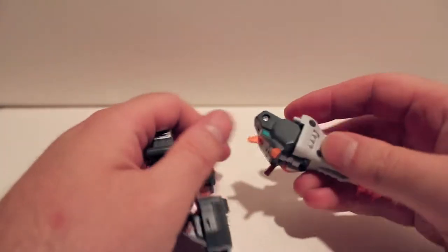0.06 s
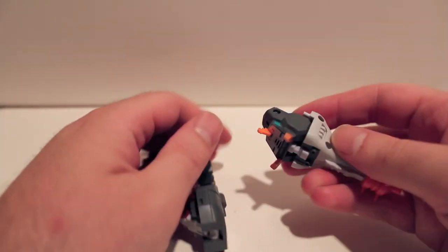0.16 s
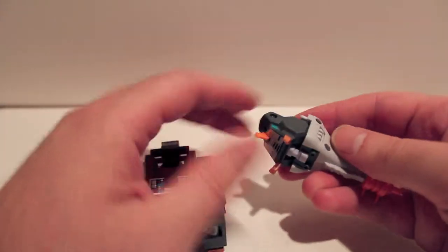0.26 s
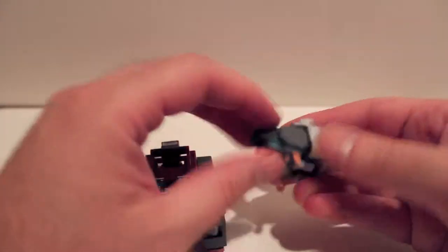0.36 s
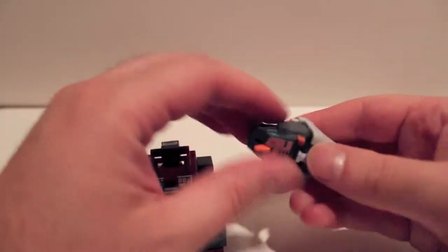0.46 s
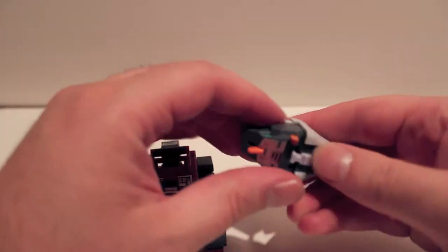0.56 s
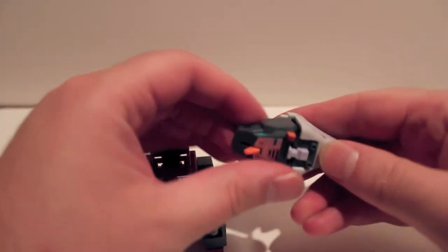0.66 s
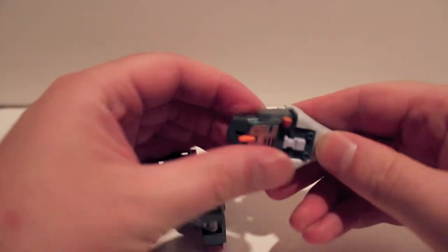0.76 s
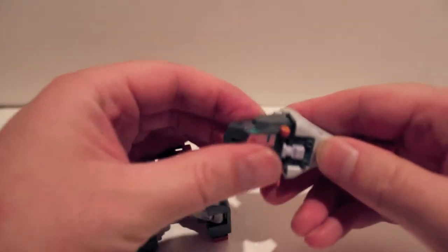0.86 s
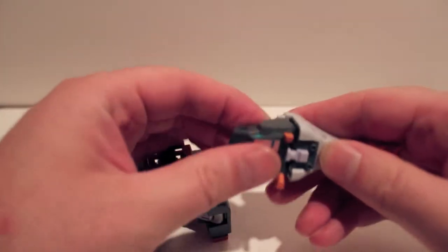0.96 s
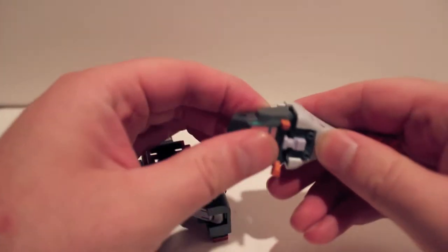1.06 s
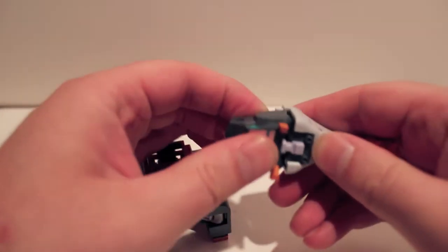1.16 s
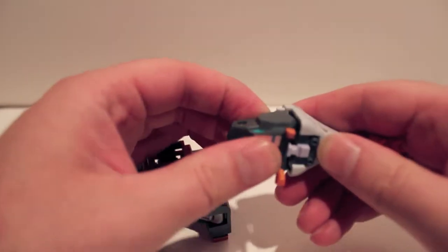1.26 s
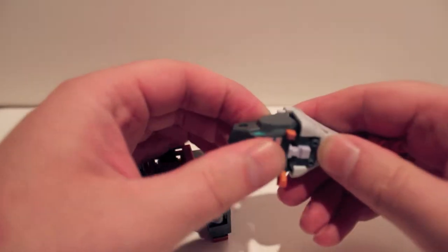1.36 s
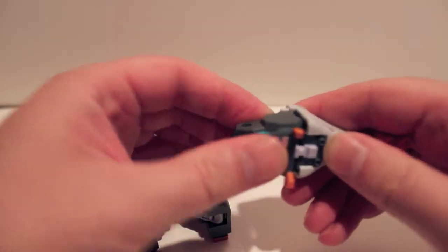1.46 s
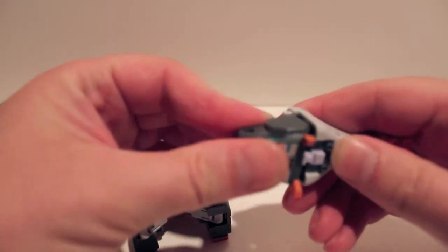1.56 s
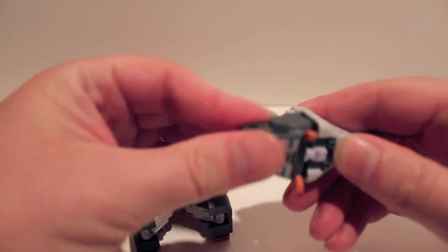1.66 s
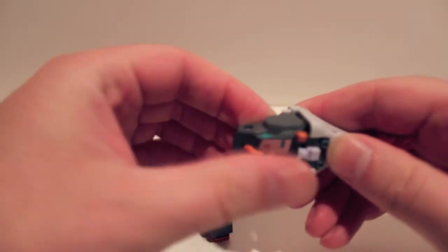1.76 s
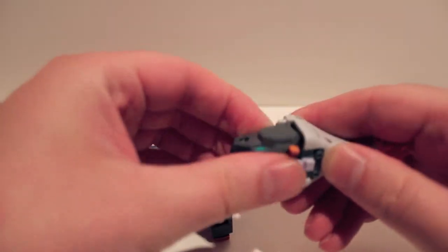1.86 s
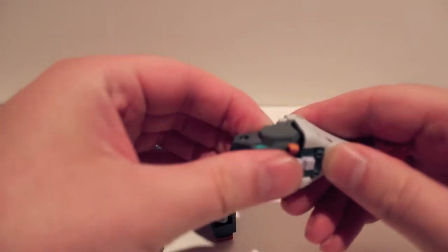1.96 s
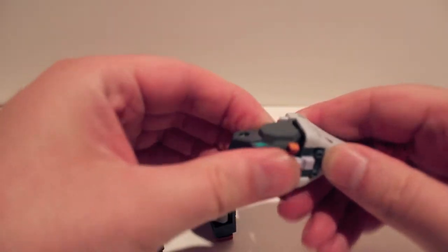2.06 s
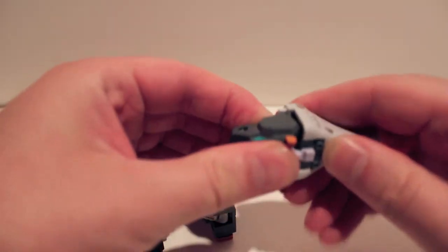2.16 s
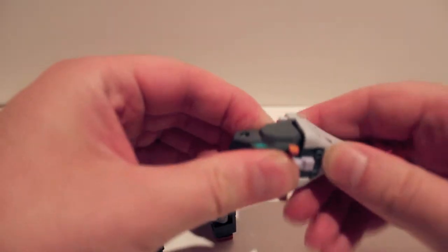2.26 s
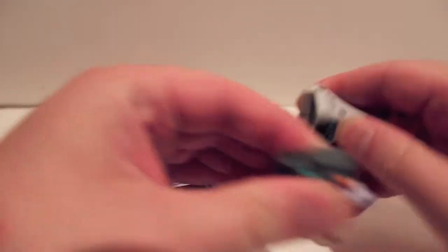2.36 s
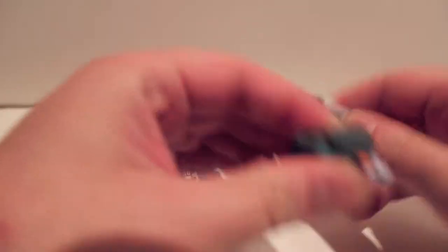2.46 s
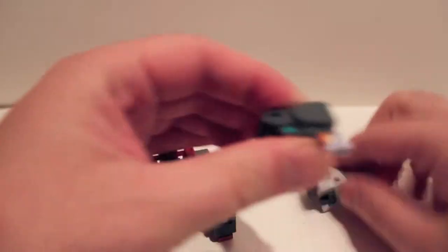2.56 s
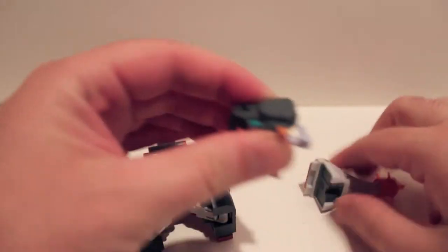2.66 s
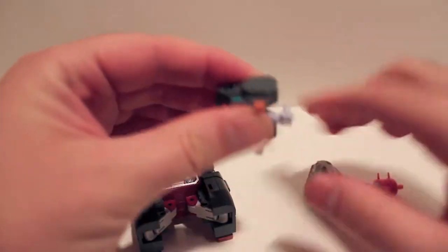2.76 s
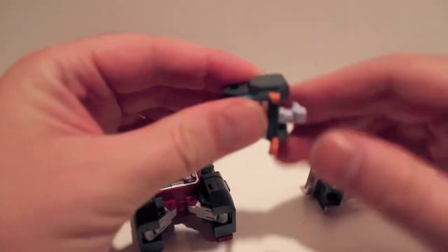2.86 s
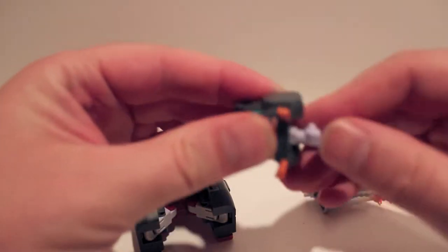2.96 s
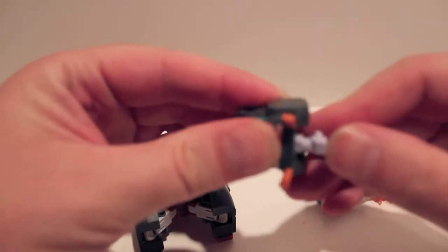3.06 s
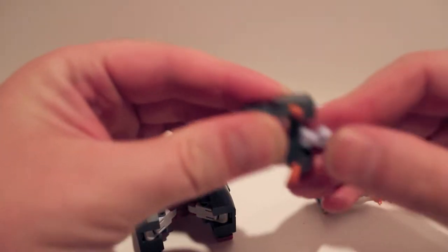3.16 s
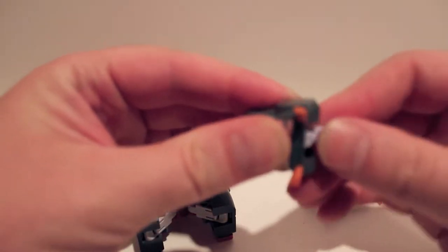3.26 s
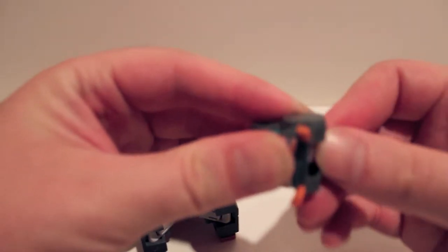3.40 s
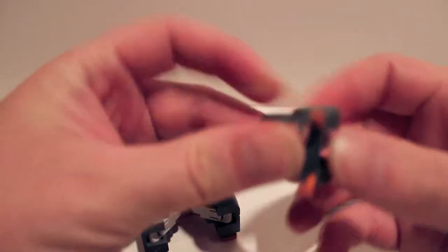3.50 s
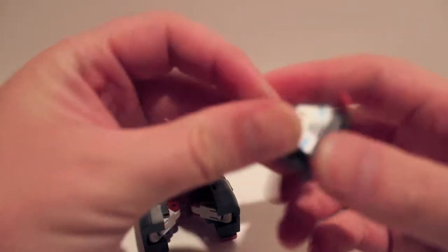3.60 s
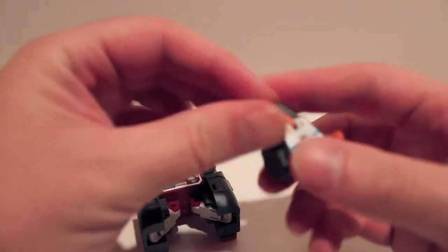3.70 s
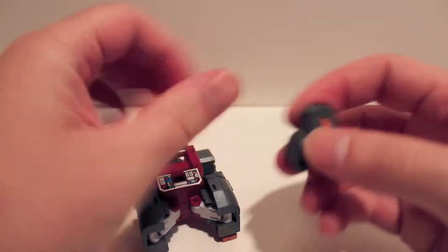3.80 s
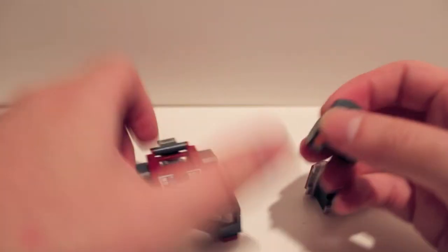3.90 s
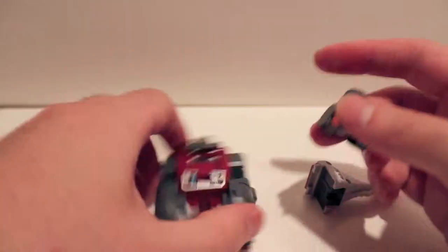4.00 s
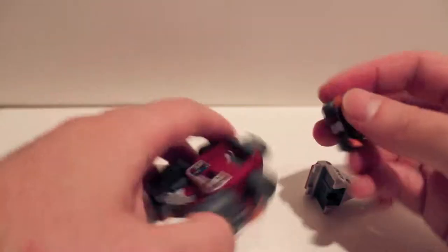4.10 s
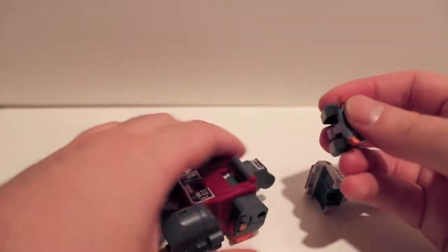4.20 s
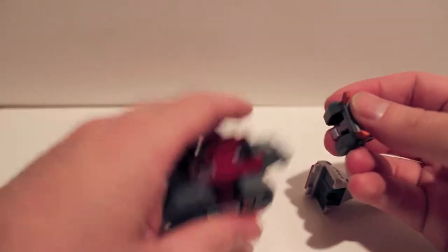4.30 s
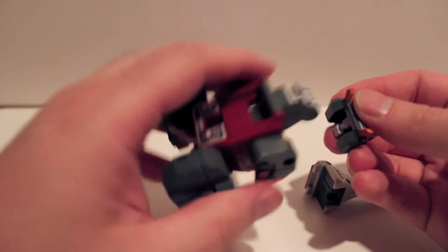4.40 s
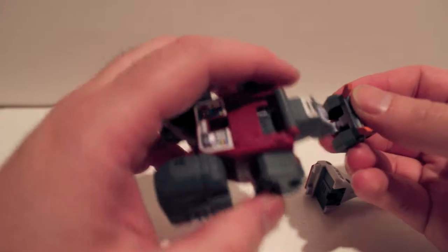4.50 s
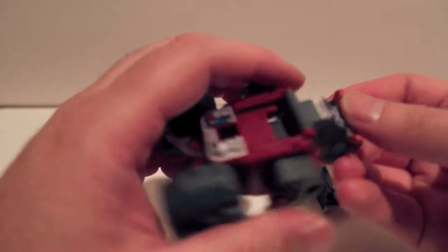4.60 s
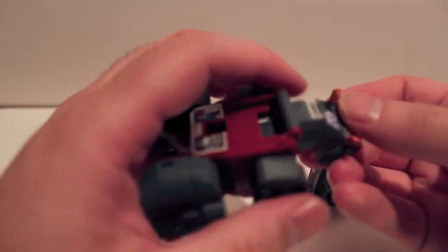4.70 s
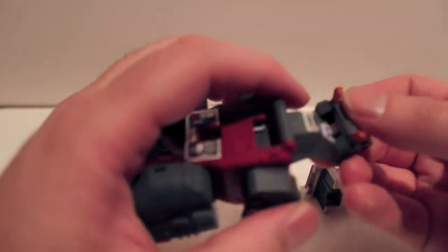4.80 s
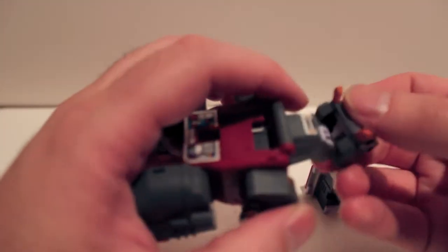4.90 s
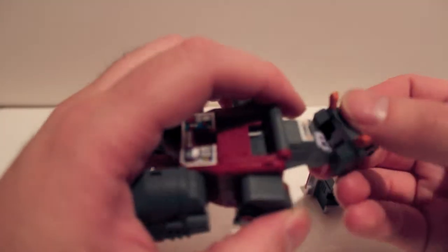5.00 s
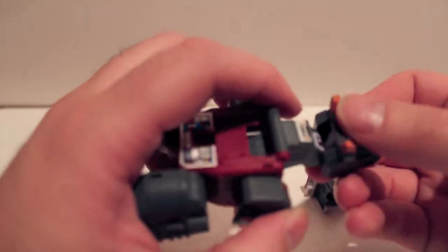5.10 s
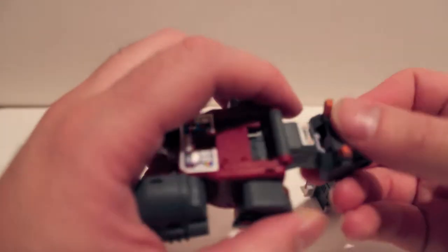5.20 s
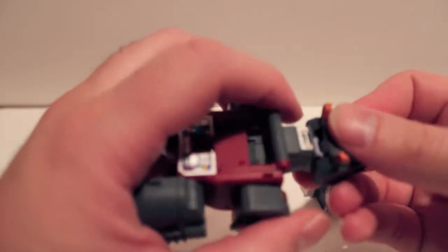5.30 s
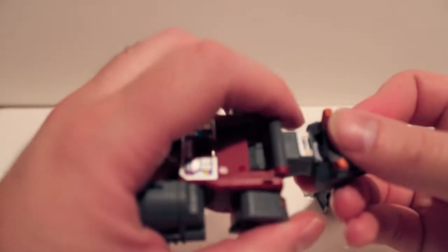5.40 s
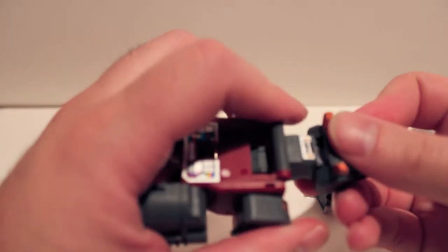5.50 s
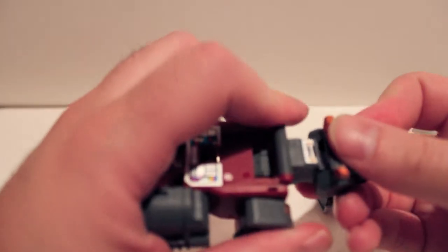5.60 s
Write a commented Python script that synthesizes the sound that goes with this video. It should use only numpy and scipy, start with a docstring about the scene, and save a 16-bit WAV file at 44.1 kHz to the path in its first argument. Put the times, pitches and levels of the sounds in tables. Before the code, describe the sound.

A close, quiet indoor scene of a small jointed plastic toy being folded by hand over a hollow table. A soft dull bump opens it, then a strong woody knock at 0.2 s with a small click. Tiny dry creaks follow around 0.4-0.65 s and 0.9 s, with faint finger rubbing and random ticks. From about 1 to 2.2 s it is mostly light rubbing over a swelling low rumble. A crisp snap lands at 2.34 s, then a flurry of hollow knocks at 2.6-2.8 s. Light clicks and faint creaks run from 2.8 to 3.6 s. A double snap with a softer bump comes at 3.95 s, knocks at 4.03 and 4.2 s, and the loudest, sharp plastic snap at 4.63 s. Bright clicks quicken from 4.7 to 5.26 s. Throughout, a low hum near 59 Hz beats slowly, fading about every 1.2 s, under faint hiss and short room reflections.

```python
"""A small plastic toy is folded by two hands above a hollow table, close to the microphone, in a quiet room.
Knocks ring the table's modes (its natural tones); joints click by ringing the plastic shell and creak
as filtered bursts of tiny slips. Fingers rub the plastic as uneven coloured noise.
Behind them two close low tones beat slowly, under a low rumble and a faint hiss of coloured noise."""
import sys
import numpy as np
from scipy import signal
from scipy.fft import rfft, irfft
from scipy.io import wavfile

SR = 44100
rng = np.random.default_rng(int(sys.argv[2]) if len(sys.argv) > 2 else 0)


def output_pcm(signal):
    """Save a mono or channel-first signal as 16-bit PCM at the path in sys.argv[1].

    Samples are clipped to [-1, 1] before scaling.
    """
    pcm = np.clip(np.atleast_2d(signal).T, -1, 1) * 32767
    wavfile.write(sys.argv[1], SR, np.round(pcm).astype(np.int16))


N = 249165
TIME = np.arange(N) / SR
RING = TIME[:SR // 2]  # time axis of one struck sound, half a second

# colour of rubbed plastic: f/Hz, level/dB
RUBBED_PLASTIC = [(400, 0), (1500, -5.5), (2400, -3.5), (3200, -3), (5000, -0.5), (7500, -5), (11000, 0),
                  (13500, -3), (16000, 4.5)]
# strokes of a finger over the plastic: time of reaching full level t/s, time held/s, level/dB
FINGER_STROKES = [(0, 0.11, -48), (.84, 0.054, -53.5), (1.537, 0.063, -48), (1.777, 0.18, -46.5),
                  (2.463, 0.022, -45), (3.696, 0.083, -57), (3.87, 0.27, -44), (4.353, 0.016, -55)]
STROKE_ATTACK_S, STROKE_RELEASE_S = 0.05, 0.05  # time constants


def undb(db):
    """Turn decibels into a gain."""
    return 10 ** (np.asarray(db) / 20)


def unit(x):
    """Scale to an rms (average strength) of 1."""
    return x / np.sqrt(np.mean(x ** 2))


def fade(t60):
    """Die away over one ring, falling by 60 dB in t60 seconds."""
    return np.exp(-np.log(1000) * RING / t60)


def swell(events, attack_s, release_s):
    """Gain over time: each event rises to its level by its listed time, holds it and dies away."""
    total = np.zeros(N)
    for s, length, db in events:
        before = np.maximum(s - TIME, 0)
        after = np.maximum(TIME - s - length, 0)
        total += undb(db) * np.exp(-before / attack_s - after / release_s)
    return total


def colour(x, points):
    """Shape the spectrum by (f/Hz, level/dB) points, then scale to rms 1."""
    hz, db = np.transpose(points)
    bins = np.maximum(np.fft.rfftfreq(len(x), 1 / SR), 1)
    gains = undb(np.interp(np.log(bins), np.log(hz), db))
    return unit(irfft(rfft(x) * gains, len(x)))


def cut(x, hz, kind, order=2):
    """Keep only what lies below hz ("low") or above it ("high")."""
    sos = signal.butter(order, min(hz, SR / 2 - 1), kind, fs=SR, output="sos")
    return signal.sosfilt(sos, x)


def add(track, s, sound):
    """Mix a sound into the track at time s."""
    start = max(int(s * SR), 0)
    track[start:start + len(sound)] += sound[:max(N - start, 0)]


def air():
    """Steady background hiss: noise that is weaker towards the treble."""
    # colour of the hiss: f/Hz, level/dB
    air_colour = [(35, -11), (80, 2), (200, 3), (400, -3), (1000, -9), (3000, -16), (8000, -23.5),
                  (15500, -29)]
    return undb(-53) * colour(rng.standard_normal(N), air_colour)


def hum(hum_hz=58.8, beat_s=1.19, quiet_s=0.56, db=-47, partner_db=0.0, octave_db=-54):
    """Two low tones of nearly the same pitch beat: they cancel at quiet_s and every beat_s from there."""
    phase = 2 * np.pi * hum_hz * TIME
    partner = phase - 2 * np.pi * (TIME - quiet_s) / beat_s
    pair = np.sin(phase) - undb(partner_db) * np.sin(partner)
    octave = np.sin(2 * partner)  # a faint steady tone an octave above the partner
    return undb(db) * pair + undb(octave_db) * octave


def rumble(steady_db=-55, attack_s=0.17, release_s=0.24):
    """Low rumble of the table top: coloured noise at a steady level, with one swell."""
    # colour of the rumble: f/Hz, level/dB
    rumble_colour = [(50, -10), (90, -9), (134, 5.5), (185, -17), (250, -15), (400, -27), (900, -82)]
    # the swell: time of reaching full level t/s, time held/s, level/dB
    rumble_swell = [(1.17, 0.78, -44)]
    level = np.hypot(undb(steady_db), swell(rumble_swell, attack_s, release_s))
    return colour(rng.standard_normal(N), rumble_colour) * level


def room(x, wet_db, t60, bass_hz, first_s=0.0013):
    """A small room answers with a short, dense noise tail, thinned below bass_hz."""
    noise = cut(rng.standard_normal(len(RING)), 10600, "low", order=1)
    noise = cut(noise, bass_hz, "high", order=1)
    tail = noise * fade(t60) * (RING > first_s)
    answer = signal.fftconvolve(x, tail / np.linalg.norm(tail))[:N]
    return x + undb(wet_db) * answer


def slips(size, spread_db):
    """Dense tiny releases of surfaces that stick and slip: most weak, a few strong."""
    strength = np.minimum(rng.exponential(size=size), 2 * np.pi)
    return rng.standard_normal(size) * undb(spread_db * strength)


def fingers(palm_echo=0.052, palm_s=0.0013, grain_db=4.5, grip_db=-61, grip_fall_db_per_s=0.3):
    """Skin slides over the plastic in a fine, uneven hiss, coloured by the cupped palm."""
    slow_noise = unit(cut(rng.standard_normal(N), 40, "low"))
    unevenness = undb(1.9 * slow_noise)
    hiss = colour(slips(N, spread_db=grain_db), RUBBED_PLASTIC)
    palm = palm_echo * np.roll(hiss, int(palm_s * SR))
    strokes = swell(FINGER_STROKES, STROKE_ATTACK_S, STROKE_RELEASE_S)
    resting_grip = undb(grip_db - grip_fall_db_per_s * TIME)  # rubs faintly and settles
    return unit(hiss + palm) * np.hypot(strokes, resting_grip) * unevenness


def creaks(width_hz=520):
    """A tight dragging joint scratches and keeps one shell resonance ringing."""
    # creaks: middle t/s, half of the whole span/s, level/dB, ring f/Hz, scratch level re ring/dB
    creak_list = [(0.415, 0.061, -62, 4460, 14.5), (.531, 0.063, -45.5, 4430, 4.5),
                  (0.639, .03, -54.5, 8330, 13.5), (0.892, 0.027, -52, 4380, -6),
                  (2.339, 0.013, -35.5, 3840, 6), (3.243, .05, -58.5, 4700, 6), (3.354, .06, -56, 4500, 4),
                  (3.521, 0.052, -60.5, 5020, 7), (3.892, 0.059, -48.5, 3140, 7)]
    track = np.zeros(N)
    for s, half_span, db, ring_hz, scratch_db in creak_list:
        size = int(2 * half_span * SR)
        drag = slips(size, spread_db=6.5)
        peak = signal.iirpeak(ring_hz, ring_hz / width_hz, fs=SR)
        once = signal.lfilter(*peak, drag)
        ring = unit(signal.lfilter(*peak, once))
        scratch = undb(scratch_db) * colour(drag, RUBBED_PLASTIC)
        rise_and_fall = np.hanning(size) ** 2
        add(track, s - half_span, undb(db) * rise_and_fall * (ring + scratch))
    return track


def shell(centre_hz, crack_db, focus_db=11, crack_t60=0.023, detune=0.029, scatter=0.029, scatter_t60=0.018):
    """One tap on plastic: a crack, and the shell modes near the pitch of the part that was hit."""
    # modes of the plastic shell: f/Hz, time to fall 60 dB t60/s, level/dB
    shell_modes = [(1410, .012, -7), (2800, .008, -8), (3310, .011, -1), (3950, .009, -1), (4480, .015, -3),
                   (5020, .013, -3), (5750, .009, -3), (7550, .012, -7), (10200, .007, -11),
                   (12800, .006, -16)]
    hz, t60, db = np.transpose(shell_modes)
    octaves_away = np.abs(np.log2(hz / centre_hz))
    gains = undb(db - focus_db * octaves_away)
    hz = hz * (1 + detune * rng.standard_normal(len(hz)))  # the grip shifts the modes
    signs = (-1) ** np.arange(len(hz))
    modes = np.sin(2 * np.pi * hz[:, None] * RING) * fade(t60[:, None])
    ring = (signs * gains) @ modes / np.linalg.norm(gains)
    # neighbouring parts chatter for a few milliseconds and strike the shell again
    chatter = scatter * rng.standard_normal(len(RING)) * fade(scatter_t60)
    ring = ring + signal.fftconvolve(ring, chatter)[:len(RING)]
    crack = cut(rng.standard_normal(len(RING)), 670, "high")
    crack = cut(crack, 13800, "low") * fade(crack_t60)
    return (ring + undb(crack_db) * crack) / 2


def loose_parts(count=2, middle_hz=4600, crack_db=8.5):
    """Each stroke of a finger shifts parts with a little play, which tick at random moments."""
    track = np.zeros(N)
    for s, length, _ in FINGER_STROKES:
        for when, size, part in rng.random((count, 3)):
            tick = shell(middle_hz * 2 ** (part - .5), crack_db)  # up to half an octave off the middle
            tick_db = -50 + 2 * size
            add(track, s + when * (length + STROKE_RELEASE_S), undb(tick_db) * tick)
    return track


def clicks():
    """Joints and tabs snap over their catches and ring the shell."""
    # clicks: t/s, level/dB, centre of the ring f/Hz, sharp crack re ring/dB
    click_list = [(0.0463, -36.5, 12200, 3), (0.2358, -21, 1440, -3), (.51, -39, 9000, -4),
                  (0.932, -43, 2370, 9), (2.343, -11, 4140, -11.5), (2.42, -38, 4550, 6),
                  (2.832, -35, 9000, 2.5), (3.0204, -25, 4810, -14), (3.353, -30, 4500, -6.5),
                  (3.373, -23.5, 5070, -18), (3.6052, -35.5, 4450, 6), (3.945, -16.5, 3330, -0.5),
                  (3.957, -13.5, 3940, -5.5), (4.0861, -23, 5000, -0.5), (4.6288, -2.5, 3200, -12.5),
                  (4.7043, -23.5, 3700, -7.5), (4.9503, -23.5, 2580, -12), (5.016, -25, 5000, -19),
                  (5.0966, -17, 5300, -19), (5.191, -15.5, 5350, -13), (5.2596, -12.5, 4850, -18)]
    track = np.zeros(N)
    for s, db, centre_hz, crack_db in click_list:
        add(track, s, undb(db) * shell(centre_hz, crack_db))
    return track


def contacts(second_s=0.0079, second_soft=0.36, rattle_from_s=.018, rattle_to_s=.05, rattle_db=-17.5):
    """A part lands on one edge, then on a softer second edge, then rattles once at a random moment."""
    # knocks: t/s, level/dB, place (0 middle - 1 side), contact hardness f/Hz, second edge re first/dB
    knock_list = [(.001, -9.5, 0.34, 357, -27), (0.1974, 3.5, 0.11, 2050, -42),
                  (0.2366, -14, 0.39, 4500, -24), (2.6147, -2.5, 0.95, 3030, -16),
                  (2.683, -5.5, 0.97, 1270, -14), (2.7412, -9.5, 1, 3840, -6.5),
                  (2.7756, -18, 1, 1500, -17), (3.956, -11.5, .36, 647, 7), (4.03, -10.5, 0.75, 267, -12),
                  (4.184, 0, 0, 2580, -16), (4.2144, -8, 0.88, 4850, -39)]
    rows = []  # t/s, level/dB, place, hardness f/Hz
    for s, db, place, hard_hz, second_db in knock_list:
        rattle_s = rng.uniform(rattle_from_s, rattle_to_s)
        rattle_place = (place + rng.random()) / 2
        rows.append((s, db, place, hard_hz))
        rows.append((s + second_s, db + second_db, place, hard_hz * second_soft))
        rows.append((s + rattle_s, db + rattle_db, rattle_place, hard_hz))
    return rows


def knocks(wash_db=-14, wash_t60=0.13, tick_db=-11, tick_soft_hz=830, rise_cycles=0.74, dent_floor_hz=400):
    """Toy parts land on the table; a softer contact passes less treble, so mainly low modes ring."""
    # table top: f/Hz, time to fall 60 dB t60/s, level struck in the middle/dB, level struck at the side/dB
    table_modes = [(137.7, 0.18, -17, -26), (235, 0.36, -26, -30), (253.1, 0.22, -14, -19.5),
                   (287, 0.63, -34.5, -33), (337.4, 0.16, -14.5, -23), (464.3, 0.13, -8, -30),
                   (558, 0.075, -40, -18), (617, 0.047, -23, -23), (715.4, 0.089, -15.5, -5),
                   (750, 0.033, -9, -14), (838, 0.072, -15, -19.5), (1100, 0.022, -33, -12),
                   (1270, 0.12, -26.5, -28), (1364, 0.024, -12, -8.5), (1565, 0.13, -51, -42),
                   (1972, 0.036, -24.5, -14), (2377, 0.017, -40, -7.5)]
    # the crowd of weaker table modes: f/Hz, level struck in the middle/dB, level struck at the side/dB
    table_wash = [(190, -47, -13), (387, 16, -25), (487, 15, -26), (780, -11.5, 2.5), (960, -8, 5),
                  (1480, -5, -4), (2260, -10.5, -12.5), (2700, -16, -11), (3240, -12, -26),
                  (6000, -19, -35), (15000, -41, -42.5)]
    # the spot under a blow, heavily damped: f/Hz, time to fall 60 dB t60/s, level/dB
    dent_modes = [(680, 0.0039, -4.5), (1462, 0.027, -13.5)]
    track = np.zeros(N)
    hz, t60, middle_db, side_db = np.transpose(table_modes)
    wash_hz, wash_middle_db, wash_side_db = np.transpose(table_wash)
    cycles = hz[:, None] * RING
    # the board takes about a cycle to swing up, so the lows come last
    swing_up = 1 - np.exp(-cycles / rise_cycles)
    modes = np.sin(2 * np.pi * cycles) * fade(t60[:, None]) * swing_up
    # the spot under the blow gives way at once and springs back; it is too small to radiate bass
    dent = sum(undb(db) * np.sin(2 * np.pi * f * RING) * fade(t) for f, t, db in dent_modes)
    dent = cut(dent, dent_floor_hz, "high")
    for s, db, place, hard_hz in contacts():
        place = np.clip(place, 0, 1)
        top = undb(middle_db + place * (side_db - middle_db)) @ modes
        crowd_db = wash_middle_db + place * (wash_side_db - wash_middle_db)
        crowd = colour(rng.standard_normal(len(RING)), np.column_stack([wash_hz, crowd_db]))
        wash = undb(wash_db) * crowd * fade(wash_t60)
        blow = cut(top + wash + (1 - place / 2) * dent, hard_hz, "low")
        # the part's own tick; soft contacts lose most of it
        tick_gain = undb(tick_db) / (1 + (tick_soft_hz / hard_hz) ** 2) ** 2
        tick = tick_gain * shell(7500, crack_db=0, focus_db=10)
        add(track, s, undb(db) * (blow + tick))
    return track


def scene():
    """The toy and the table in the room, over rumble, hum and hiss."""
    background = air() + hum() + rumble()
    toy_dry = fingers() + creaks() + loose_parts() + clicks()
    toy = room(toy_dry, wet_db=-10.5, t60=.27, bass_hz=3200)
    table = room(knocks(), wet_db=-13, t60=0.37, bass_hz=1250)
    return (background + toy + table)[None]


def record(dry):
    """The recorder thins the deepest bass, clips at full scale and cuts the top."""
    clipped = np.clip(cut(dry, 42, "high", order=4), -1, 1)
    top_cut = signal.ellip(12, .1, 85, 15800, fs=SR, output="sos")  # steep cut above 15800 Hz
    return signal.sosfilt(top_cut, clipped)


dry = scene()
out = record(dry)
output_pcm(out)
```